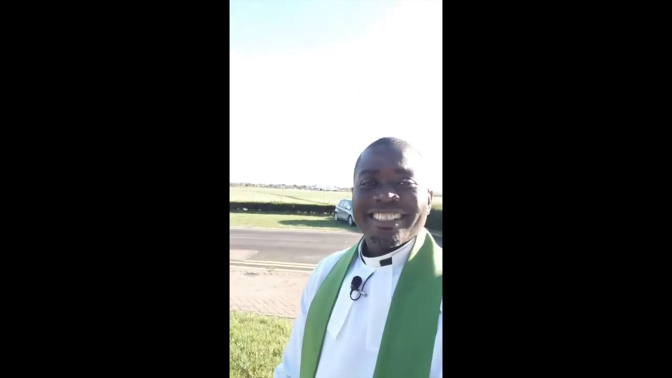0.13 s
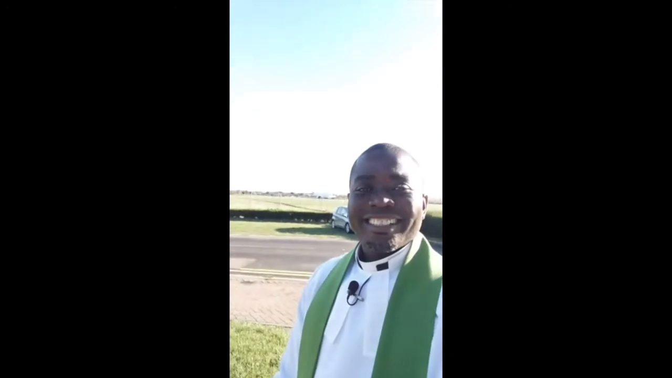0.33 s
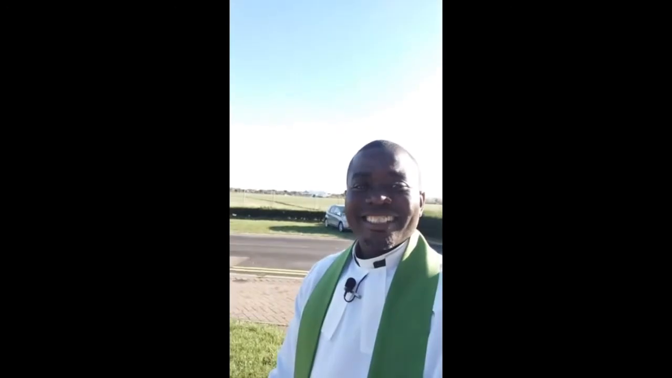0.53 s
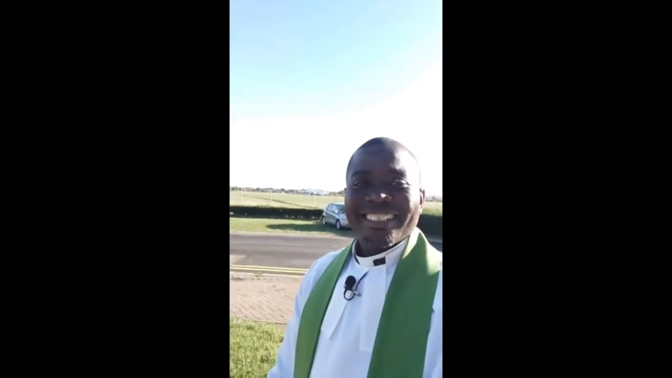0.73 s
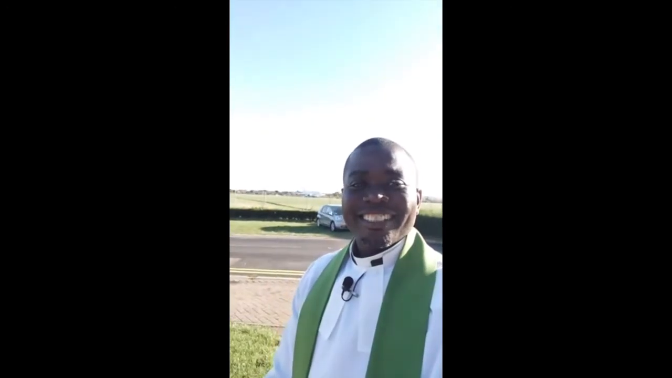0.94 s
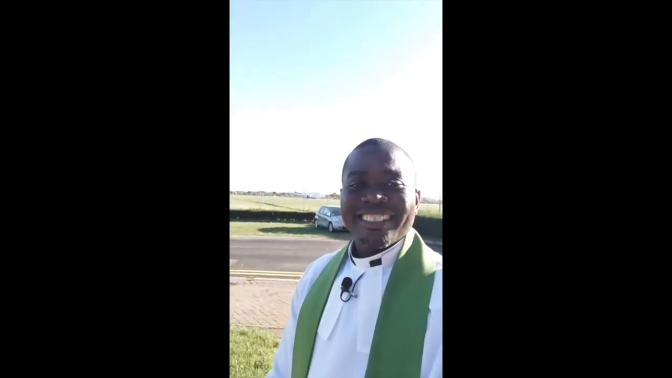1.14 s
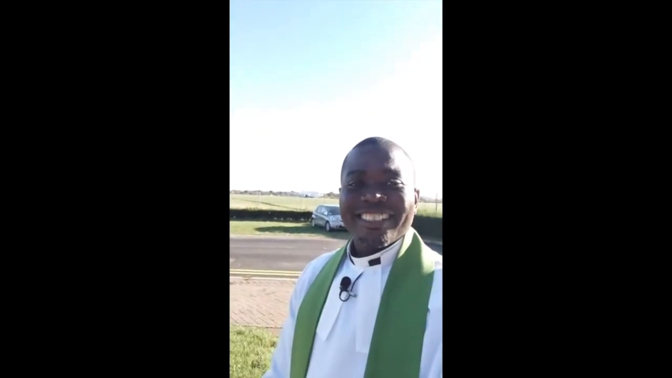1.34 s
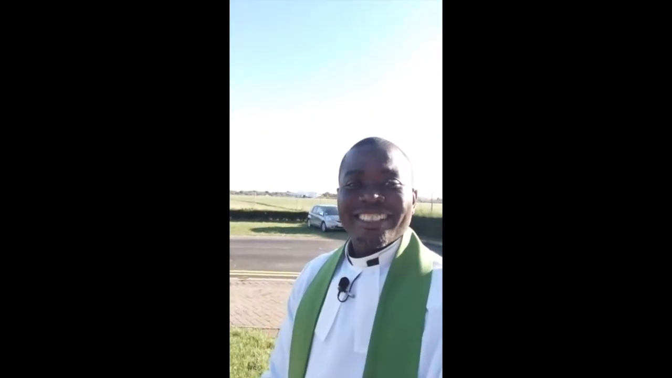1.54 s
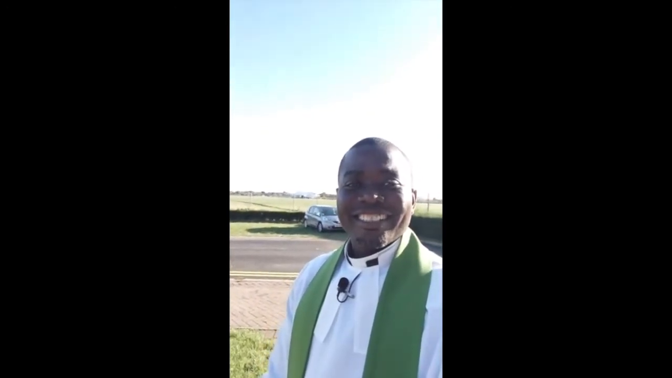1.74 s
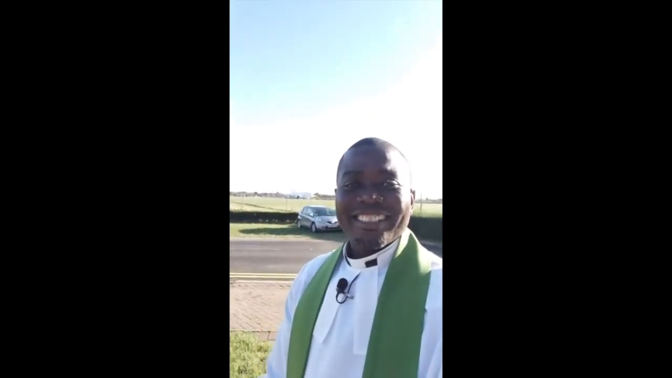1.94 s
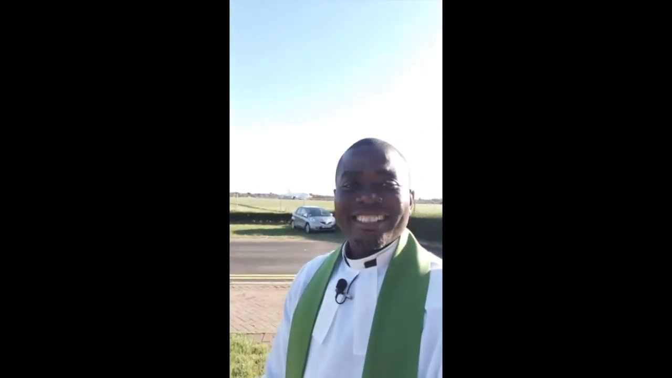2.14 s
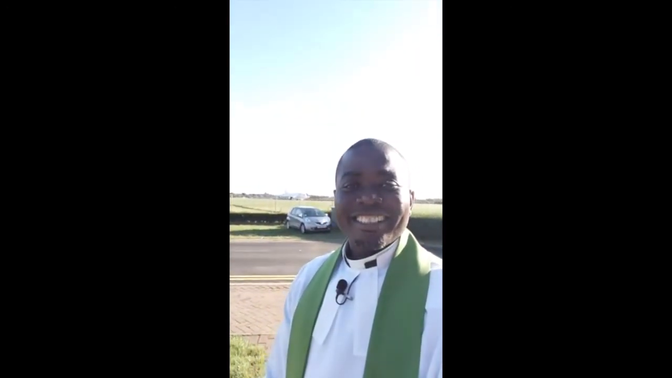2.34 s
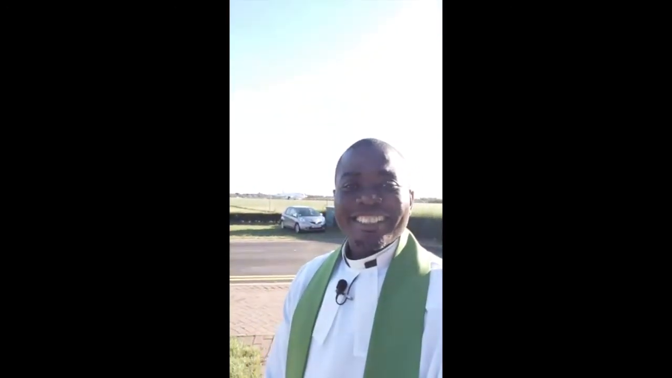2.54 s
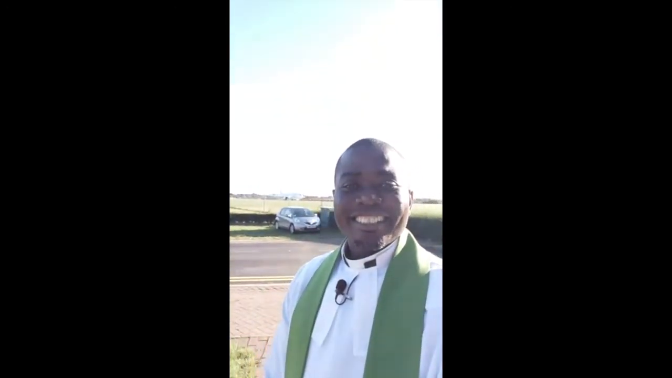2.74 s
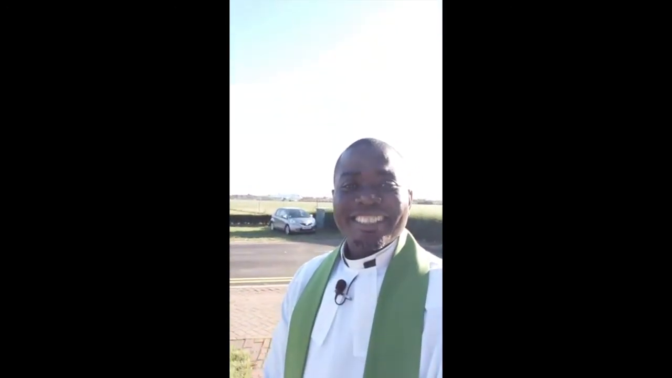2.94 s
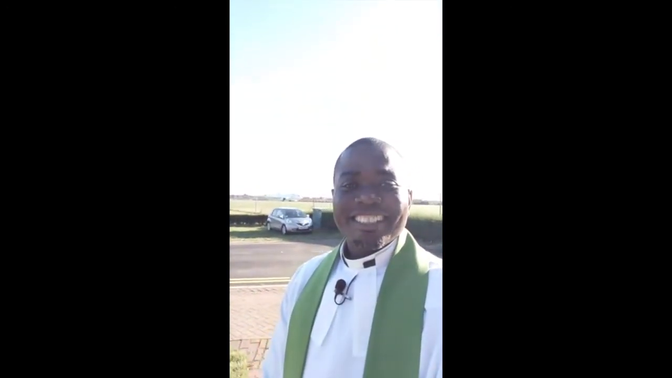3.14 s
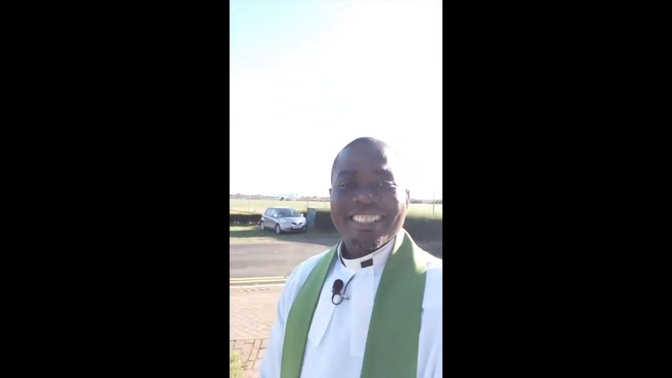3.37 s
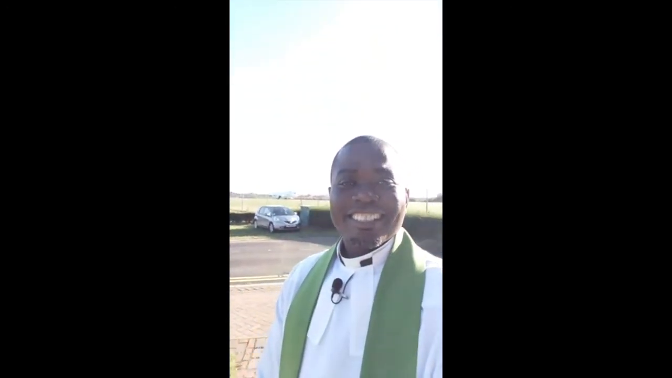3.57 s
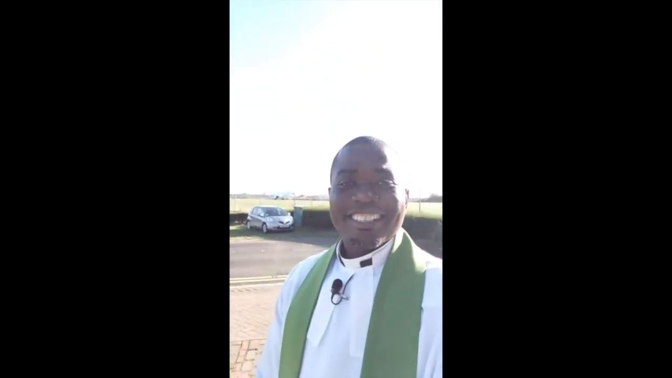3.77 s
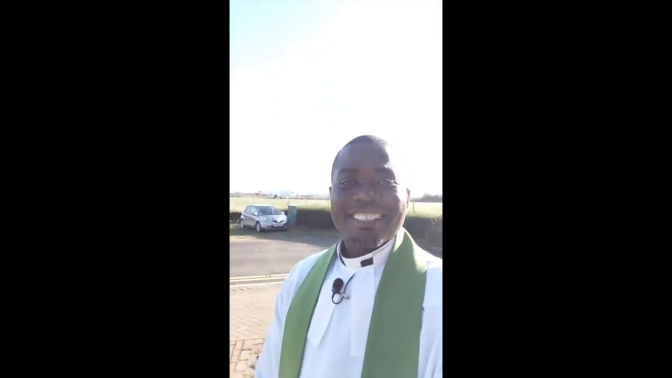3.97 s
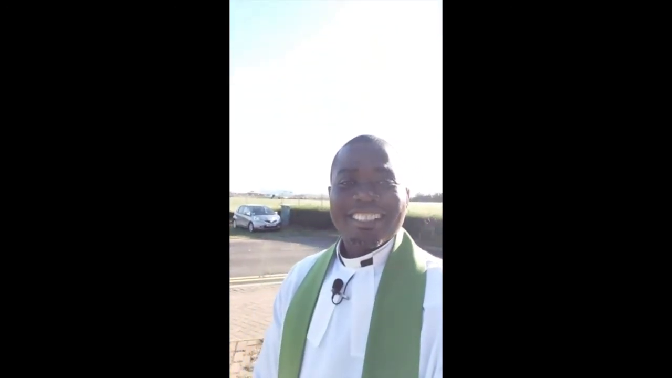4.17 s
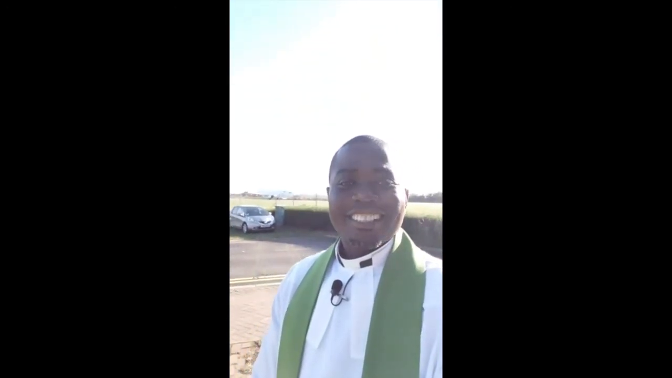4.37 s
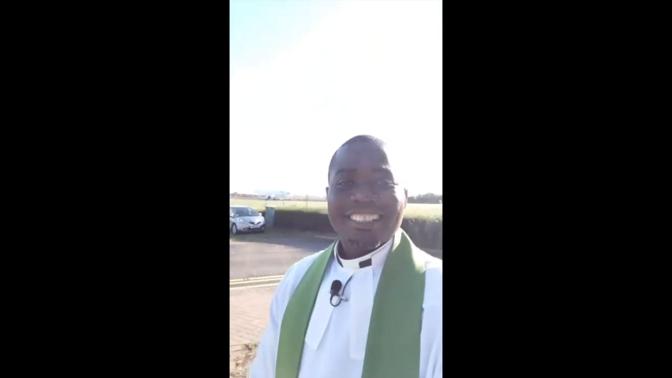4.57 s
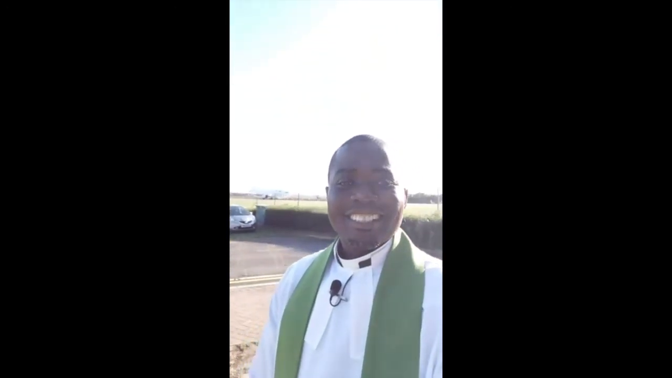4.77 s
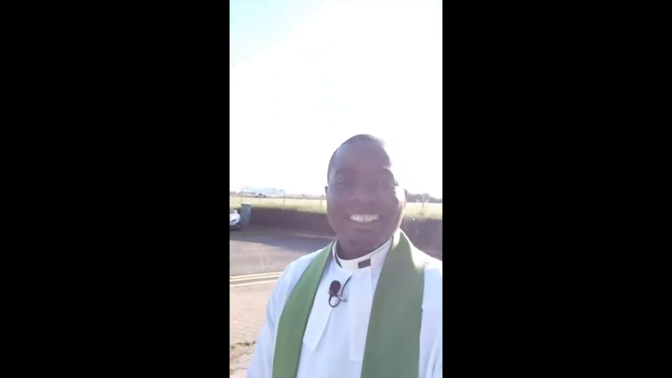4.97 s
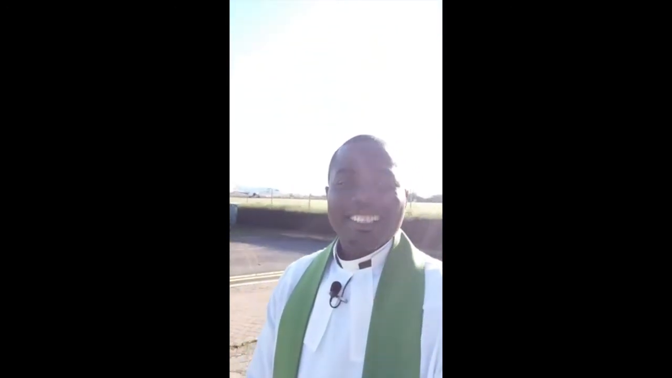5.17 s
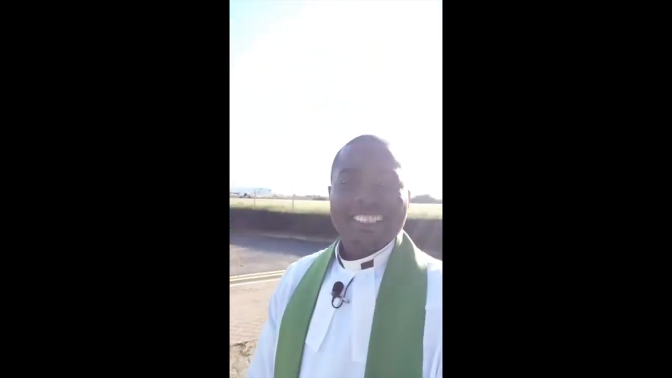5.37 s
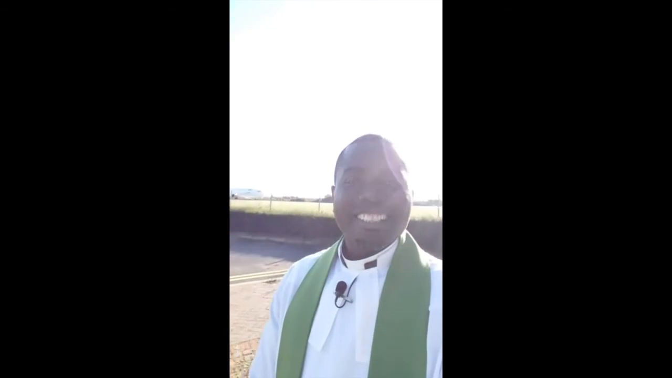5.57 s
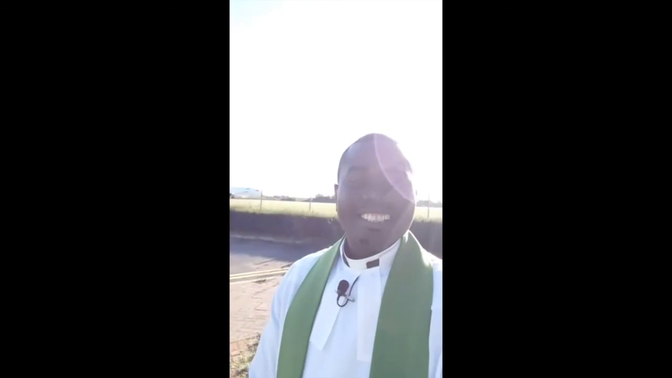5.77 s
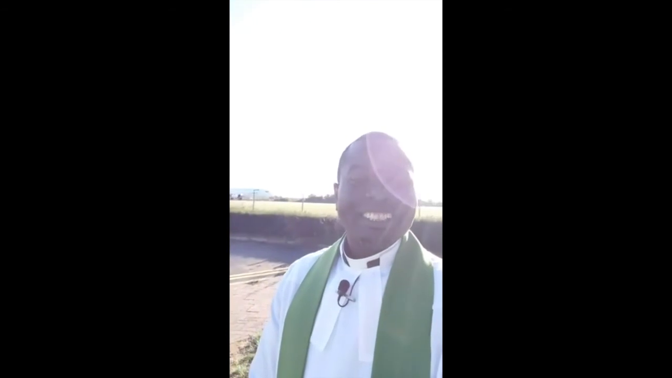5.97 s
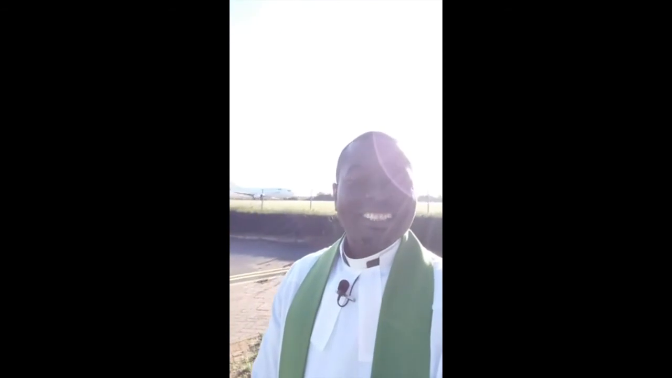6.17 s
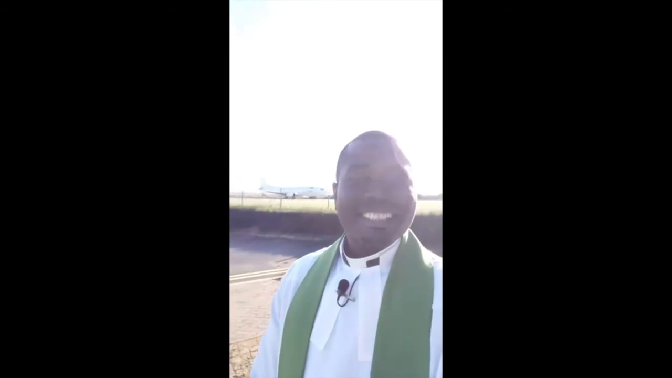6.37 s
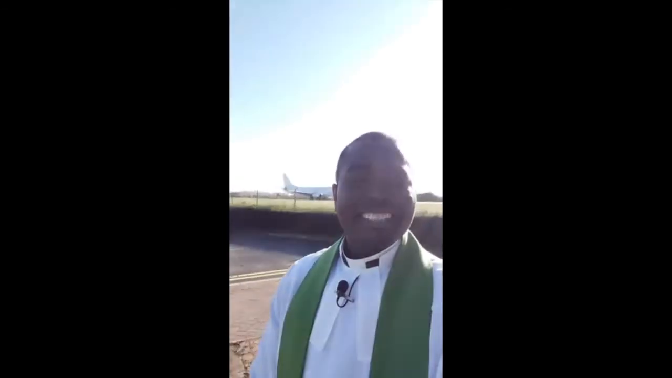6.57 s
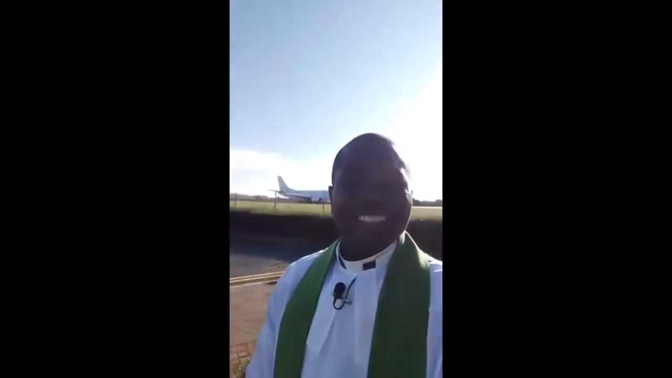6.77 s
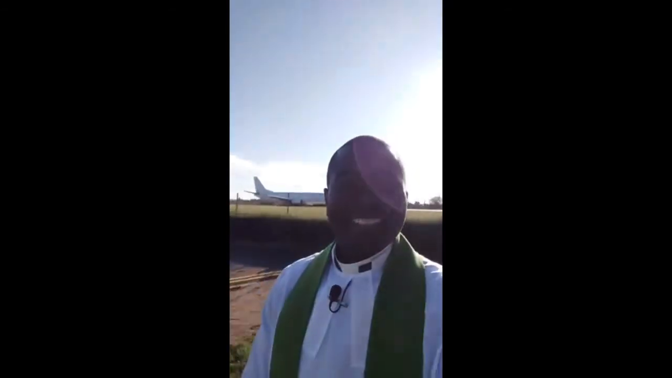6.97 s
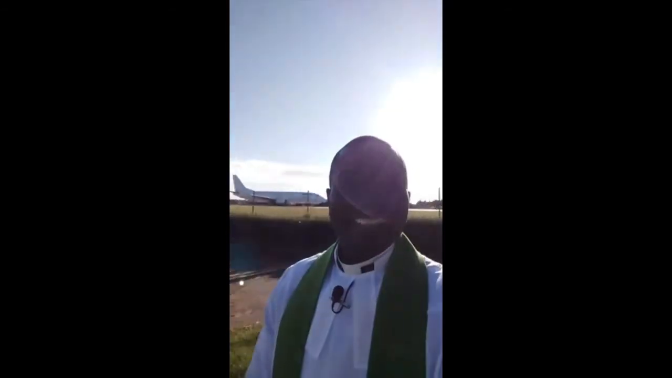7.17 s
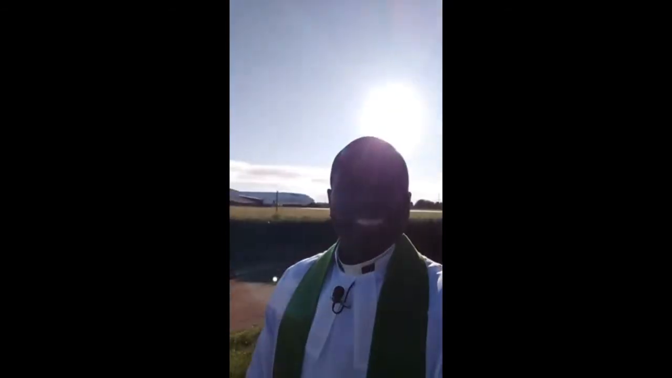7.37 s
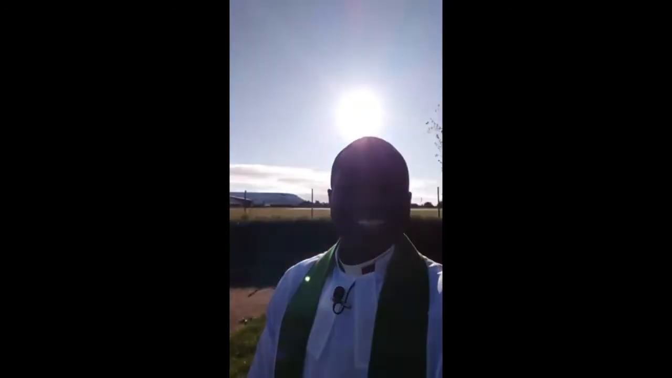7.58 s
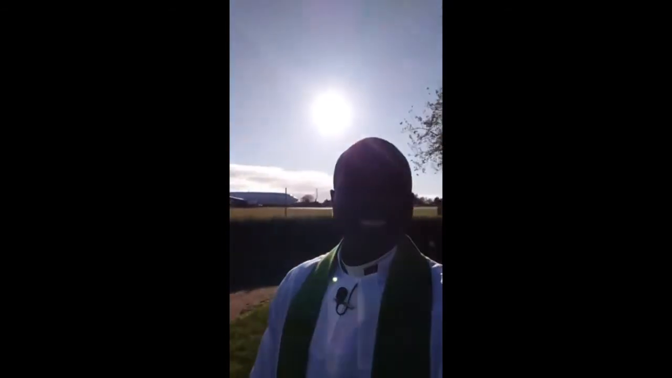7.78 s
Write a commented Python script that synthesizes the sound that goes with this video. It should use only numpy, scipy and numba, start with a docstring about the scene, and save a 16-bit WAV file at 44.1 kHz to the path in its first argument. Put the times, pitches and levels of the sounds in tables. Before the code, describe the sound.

Jet engine noise fills the outdoors continuously: broad fluttering hiss, deep exhaust rumble and a shrill two-engine whine rising in the first two seconds. The roar becomes louder and coarser as a sawing buzz emerges, peaks around six seconds, dips, and swells once more. The phone sound is slightly compressed, dull on top, with tiny silent gaps, one longer near the start.

```python
"""A twin-jet airliner spools up and rolls past on a runway, heard from a field through a phone.
Its jets mix with the air and rumble, as low noise below a dip cut by the soft ground.
Its fans add a hiss (noise in many bands), a whine at blade rate and a buzz on shaft orders (wavering sines).
Turbulent air makes it all flutter, and two faint whistles rise over the roar early on.
Peaks are rounded, the treble is dull with nothing above 15.7 kHz, and a few short stretches drop out."""
import sys
import numpy as np
from scipy import signal
from scipy.fft import rfft, irfft, next_fast_len
from scipy.io import wavfile
from scipy.ndimage import uniform_filter1d
from numba import njit

SR = 44100
rng = np.random.default_rng(int(sys.argv[2]) if len(sys.argv) > 2 else 0)


def wav_out(sig):
    """Save sig, one row per channel (or a flat mono array), as 16-bit PCM at SR to the path in sys.argv[1]."""
    wavfile.write(sys.argv[1], SR, np.round(np.clip(np.atleast_2d(sig).T, -1, 1) * 32767).astype(np.int16))


N = 344421  # length in samples


def undb(db):
    """Turn decibels into a gain."""
    return 10 ** (np.asarray(db) / 20)


def curves(table):
    """Join the columns of a table by straight lines in time; the first column is the time in s."""
    time_s, *columns = np.transpose(table)
    return [np.interp(np.arange(N) / SR, time_s, column) for column in columns]


def walk(rate_hz):
    """Random levels, a new one every 1 / rate_hz seconds, smoothed twice; spread near 1."""
    hold = int(SR / rate_hz)
    steps = np.repeat(rng.standard_normal(N // hold + 1), hold)
    smooth = uniform_filter1d(uniform_filter1d(steps, hold), hold)
    return 1.04 * smooth[:N]


def coloured(colour):
    """Frequencies and spectrum of random noise shaped by (pitch_hz, level_db) points."""
    size = next_fast_len(N)
    hz = np.maximum(np.arange(size // 2 + 1) * SR / size, 1)
    point_hz, point_db = np.transpose(colour)
    shape_db = np.interp(np.log(hz), np.log(point_hz), point_db)
    return hz, rfft(rng.standard_normal(size)) * undb(shape_db)


@njit
def svf(x, hz, k):
    """State-variable filter with a moving edge: returns low-pass and high-pass; a larger k rings less."""
    low, high, band_state, low_state = np.empty(len(x)), np.empty(len(x)), 0., 0.
    for i in range(len(x)):
        g = np.tan(np.pi * hz[i] / SR)
        band = (band_state + g * (x[i] - low_state)) / (1 + g * (g + k))
        low[i] = low_state + g * band
        high[i] = x[i] - k * band - low[i]
        band_state, low_state = 2 * band - band_state, 2 * low[i] - low_state
    return low, high


def tone(turns, waver, fade_db, rate_hz):
    """A sine whose phase (waver, in turns) and level wander with the air it crosses."""
    level = np.sqrt(2) * undb(fade_db * walk(rate_hz))
    return level * np.sin(2 * np.pi * (turns + waver * walk(rate_hz)))


def whistle(t):
    """Brief rising tones that swell and stop, each a sine whose pitch climbs steadily."""
    # short whistles over the roar: (start_s, end_s, pitch_hz at the start, rise_hz_per_s, level_db)
    rising_tones = [(.7, .92, 1909, 200, -35.5), (-.1, .5, 7080, 750, -45)]
    out = 0
    for start_s, end_s, pitch_hz, rise_hz_per_s, level_db in rising_tones:
        progress = (t - start_s) / (end_s - start_s)
        swell = np.clip(np.minimum(6 * progress, 8 * (1 - progress)), 0, 1)
        turns = np.cumsum(pitch_hz + rise_hz_per_s * (t - start_s)) / SR
        out = out + undb(level_db) * swell * tone(turns, waver=.15, fade_db=2., rate_hz=30)
    return out


def fans(blade_hz):
    """Blades passing make each engine's whine and octave; shocks off the near fan's blade tips buzz."""
    # (time_s, whine_db, octave_db, buzz_db, far_faster_percent); levels are above the hiss,
    # the last column is how much faster the far engine turns
    fan_levels = [(0, -4, -10.5, -29, -1), (.35, -6, -12, -29, -.6), (.6, -9, -18.5, -29, .8),
                  (1.2, -7.5, -17, -29, 1.8), (1.7, -7.5, -18.5, -28, 1), (2.1, -10, -20, -25, -.6),
                  (2.8, -12.5, -24, -21, -.7), (3.7, -12, -20, -19, -.4), (4.1, -10, -21.5, -16.5, .9),
                  (4.7, -11.5, -21, -16, 1), (5.05, -10, -20, -15.5, 1), (5.25, -20, -19, -17, 1),
                  (5.45, -10.5, -19, -16, 1), (6, -12.5, -21, -17, .8), (6.15, -21, -22, -21, .8),
                  (6.45, -22, -21, -26, .8), (7, -20, -21, -28, 1), (7.81, -20, -21, -28, 1)]
    # shocks off unequal blade tips sound multiples of the shaft rate:
    # (multiple of the shaft rate, level_db against the strongest)
    shaft_orders = [(7, -11), (10, -11), (11, -12), (13, -10), (17, -10), (21, -2), (22, -9), (23, -6),
                    (24, -4), (25, -5), (26, -1), (28, -8), (29, -4), (30, -8), (35, -3), (36, -6),
                    (37, -11), (39, -6), (40, -6), (41, 0), (42, -8), (43, -8), (46, -6), (47, -4),
                    (48, -4), (50, -8), (51, -9), (62, -12)]
    # weaker multiples of the shaft rate, all at one level
    faint_orders = (27, 31, 32, 33, 34, 44, 45, 49, 52, 53, 54)
    faint_db = -12
    blades = 38
    far_engine_db, far_octave_db = -3, -6
    hump_db, hump_width_hz = -.5, 150

    whine_db, octave_db, buzz_db, far_faster_percent = curves(fan_levels)
    shaft_turns = np.cumsum(blade_hz / blades) / SR
    far_turns = np.cumsum(blade_hz * (1 + far_faster_percent / 100)) / SR
    near_engine = (blades * shaft_turns, 0, 0)
    far_engine = (far_turns, far_engine_db, far_octave_db)
    whine = 0
    for turns, engine_db, engine_octave_db in (near_engine, far_engine):
        whine = whine + undb(engine_db + whine_db) * tone(turns, waver=.33, fade_db=2.5, rate_hz=30)
        octave = tone(2 * turns, waver=.35, fade_db=4., rate_hz=30)
        whine = whine + undb(engine_octave_db + octave_db) * octave

    buzz = 0
    for order, order_db in list(shaft_orders) + [(order, faint_db) for order in faint_orders]:
        turns = round(order) * shaft_turns + rng.random()
        buzz = buzz + undb(order_db) * tone(turns, waver=.22, fade_db=3., rate_hz=13)

    # turbulence scatters the whine into a hump of noise around it
    hump = walk(hump_width_hz * 2) * np.sin(2 * np.pi * blades * shaft_turns)
    return whine + undb(buzz_db) * buzz + undb(whine_db + hump_db) * hump


def hiss(low_db, middle_db, upper_db, blade_db, top_db, above_dip_db, air_db, dip_hz):
    """Fan and jet noise in half-octave bands that flutter together and also flicker alone."""
    # colour of the noise before the band levels are applied: (pitch_hz, level_db per Hz)
    hiss_colour = [(250, -8.5), (420, -5.5), (800, -5.5), (1510, -6.5), (1820, -4), (2750, -6), (3230, -3),
                   (3660, -4), (5000, -6), (6480, -8), (7530, -13.5), (9000, -15.5), (10700, -19.5),
                   (12500, -30), (14100, -34), (14600, -60), (20000, -76)]
    hz, noise = coloured(hiss_colour)
    # loudness between 1500 and 5000 Hz, used to bring the hiss to a standard level
    core_power = np.sum(abs(noise[(hz > 1500) & (hz < 5000)]) ** 2)
    core = np.sqrt(2 * core_power) / (2 * len(hz))
    octave = np.log2(hz / 1000)
    flutter_db = 0.45 * walk(7.2) + .5 * walk(30)
    out = 0
    for mid in np.arange(-2, 4.5, .5):  # band centre in octaves above 1000 Hz
        band_shape = np.cos(np.pi * np.clip(octave - mid, -.5, .5)) ** 2
        band = irfft(noise * band_shape)[:N]
        # how much this band takes part in each region of the treble and bass
        low = np.clip((.8 - mid) / 0.37, 0, 1)
        middle = np.exp(-((mid - .95) / 0.5) ** 2)
        upper = np.exp(-((mid - 2.15) / 0.66) ** 2)
        top = np.clip((mid - 1.8) / 0.94, 0, 2.2)
        tilt_db = low * low_db + middle * middle_db + upper * upper_db + top * top_db
        tilt_db += (mid == 1.5) * blade_db  # the band near 2.8 kHz
        tilt_db += (mid < -.75) * above_dip_db + (mid > 3.25) * air_db
        flicker_db = 0.9 * walk(5.5) + 0.8 * walk(20)
        out = out + band * undb(tilt_db + flutter_db + flicker_db)
    # keep what lies above the ground dip
    return svf(out / core, 1.0 * dip_hz, 0.96)[1]


def rumble(dip_hz):
    """Exhaust mixing roar: low noise doubled by the ground below the dip and cut off towards it."""
    # loudness of the rumble, before its surges: (time_s, level_db)
    rumble_levels = [(0, -21), (.35, -20), (.6, -17.5), (1.2, -15.5), (2, -15.5), (3.15, -14.5),
                     (3.3, -18.5), (3.65, -13.5), (4.1, -17), (5, -16.5), (6.05, -19), (6.9, -14.5),
                     (7.5, -12), (7.81, -17)]
    # colour of the noise before the boost and filters: (pitch_hz, level_db per Hz)
    rumble_colour = [(15, -73), (25, -36), (32, -22.5), (74, -0.5), (118, 0), (178, -7.5), (303, -20),
                     (330, -25), (430, -53.5), (730, -120)]
    # the louder the rumble, the higher its lower edge
    edge_hz, edge_hz_per_db, edge_at_db = 42, 7.5, -17.5
    surge_db = 0.83

    level_db, = curves(rumble_levels)
    hz, noise = coloured(rumble_colour)
    roar = irfft(noise * (1 + (hz / 200) ** 4))[:N]
    # three low-pass filters follow the dip as it moves
    for edge_share, k in ((0.57, 1.01), (0.57, 1.01), (0.69, 0.74)):
        roar = svf(roar, edge_share * dip_hz, k)[0]
    roar = svf(roar, edge_hz + edge_hz_per_db * (level_db - edge_at_db), 1.48)[1]
    loudness = np.sqrt(uniform_filter1d(roar ** 2, SR))  # averaged over one second
    return roar / loudness * undb(level_db + surge_db * walk(7.7))


def scene():
    """Rumble, hiss and tones, coloured by fan speed, swell and approach."""
    # loudness of the hiss, and of its low end above that: (time_s, level_db, low_end_db)
    hiss_levels = [(0, -29, 1), (.3, -27.5, 1.5), (.62, -24, -0.5), (.8, -25.5, 0.5), (1.36, -25, 2),
                   (2.4, -25.5, 1.5), (3.3, -24.5, 0.2), (4.03, -22.5, -2.5), (4.25, -21.5, -3),
                   (4.38, -20.5, -1.5), (4.5, -18.5, -3), (4.65, -18.5, -2), (4.8, -18, -2.5),
                   (5.2, -18.5, 0), (5.45, -19, 1), (5.8, -19.5, 0), (5.93, -18, -2), (6.02, -17, -2.5),
                   (6.13, -16.5, -2), (6.22, -19.5, 0), (6.38, -20.5, 0), (6.52, -22.5, 3),
                   (7.3, -23.5, 0.5), (7.48, -21.5, 2.5), (7.64, -17, -1.5), (7.81, -17.5, 2.5)]
    # bands of the hiss, above its level: (time_s, near_2_khz_db, near_4500_hz_db, near_2800_hz_db)
    band_levels = [(0, 2, 3, -2.5), (1, -1.5, 0, 0), (2, 1.5, 1, -.5), (2.8, -1.5, 0, 0),
                   (3.6, -1, -0.5, -1.5), (4.1, -0.5, -1.5, 0.5), (4.4, -2.5, 0, 0.5), (4.7, -2, -2.5, 2),
                   (5, 1, -1.5, 2.5), (5.25, 4.5, 0.5, -1.5), (5.5, 4.5, 4, 1), (5.8, -1, 2, 2),
                   (6.1, -3.5, 1.5, 2), (6.3, -2, 0, 0), (6.6, 0, -0.5, 1), (7, -0.5, -1, -1),
                   (7.5, 0, -0.5, -0.5), (7.81, 0.5, 0.5, -2)]
    # blade rate: an S-shaped spool-up, then a growing sag as the aircraft draws level
    full_hz, spool_rise_hz, spool_mid_s, spool_time_s = 3217, 812, .73, .455
    sag_hz, sag_at_s, sag_time_s = 50, 7, 1.05
    # as the aircraft draws level the ground dip climbs and the treble opens
    closing_from_s, far_dip_hz, dip_climb_hz_per_s = 3.83, 305.6, 25.5
    start_top_db, top_opens_db, top_opens_s, top_opening_s = -4.5, 5, 4.15, 0.4
    start_air_db, air_gain_db_per_s, above_dip_loss_db_per_s = -3.5, 2, 0.7
    # colour before the fans are up to speed; the rumble also reaches less high
    idle_top_db, idle_air_db, idle_above_dip_db, idle_rumble_duller_hz = 8, -7, -4.5, 40
    # the band just above the dip hardly follows the swells of the hiss: share held back
    swell_from_db, above_dip_lag = -20, 0.58

    t = np.arange(N) / SR
    hiss_db, low_db = curves(hiss_levels)
    middle_db, upper_db, blade_db = curves(band_levels)
    swell_db = hiss_db - swell_from_db
    closing_s = np.maximum(t - closing_from_s, 0)
    idle = 1 / (1 + np.exp((t - spool_mid_s) / spool_time_s))  # falls towards 0 at full speed
    blade_hz = full_hz - spool_rise_hz * idle - sag_hz * np.exp((t - sag_at_s) / sag_time_s)
    dip_hz = far_dip_hz + dip_climb_hz_per_s * closing_s

    opening = 1 / (1 + np.exp((top_opens_s - t) / top_opening_s))
    top_db = start_top_db + top_opens_db * opening + idle_top_db * idle ** 2
    above_dip_db = idle_above_dip_db * idle - above_dip_lag * swell_db
    above_dip_db = above_dip_db - above_dip_loss_db_per_s * closing_s
    air_db = start_air_db + air_gain_db_per_s * closing_s + idle_air_db * idle

    whistles = whistle(t)
    whine_and_buzz = fans(blade_hz)
    broad = hiss(low_db, middle_db, upper_db, blade_db, top_db, above_dip_db, air_db, dip_hz)
    roar = rumble(dip_hz - idle_rumble_duller_hz * idle)
    return (roar + undb(hiss_db) * (broad + whine_and_buzz) + whistles)[None]


def record(dry):
    """Peaks are rounded, the treble steps down, stretches drop out; nothing sounds above 15.7 kHz."""
    # treble and bass balance of the phone: (pitch_hz, level_db)
    phone_colour = [(20, -0.5), (7500, 0.5), (8200, -13), (8800, -18.5), (9400, -14.5), (20000, -23.5)]
    # gaps where the sound drops out: (start_s, end_s)
    drops = [(.1388, .2403), (.7473, .7623), (2.7525, 2.7623), (4.7579, 4.7623), (7.7446, 7.7624)]
    # each gap starts with a very short, faint fade instead of instant silence;
    # the time of the fade is a share of the gap
    fade_db, fade_share, gap_edge_s = -30, .07, .0002
    highest_hz = 15700

    hz, db = np.transpose(phone_colour)
    taps = signal.firwin2(513, np.r_[0, hz, SR / 2], undb(np.r_[db[0], db, db[-1]]), fs=SR)
    rounded = np.tanh(0.89 * dry) / 0.91
    wet = signal.fftconvolve(rounded, taps[None], "same")

    t, gate = np.arange(N) / SR, np.ones(N)
    for start_s, end_s in drops:
        lost = (t >= start_s) & (t < end_s)
        fade_s = fade_share * (end_s - start_s)
        gate[lost] = undb(fade_db) * np.exp(-(t[lost] - start_s) / fade_s)
    gate = uniform_filter1d(gate, int(gap_edge_s * SR))
    low_pass = signal.ellip(8, .2, 70, highest_hz, fs=SR, output="sos")
    return signal.sosfilt(low_pass, wet * gate)


dry = scene()
out = record(dry)
wav_out(out)
```